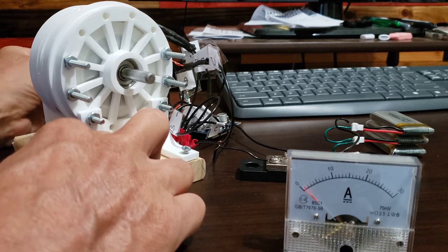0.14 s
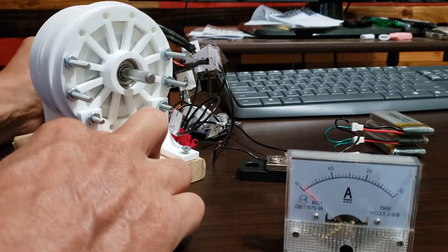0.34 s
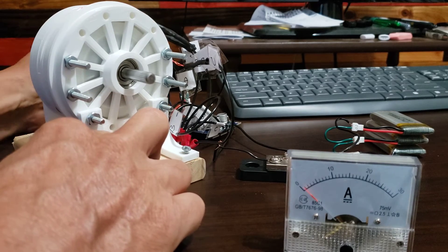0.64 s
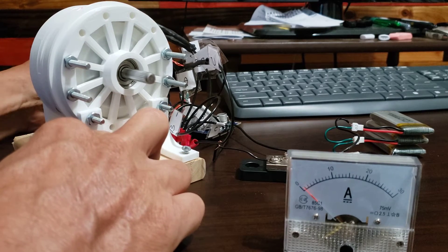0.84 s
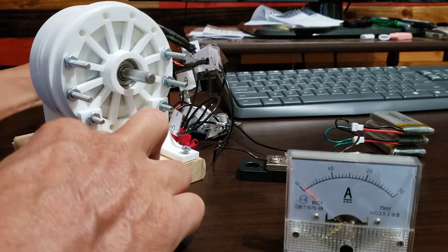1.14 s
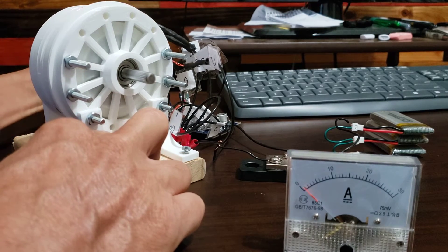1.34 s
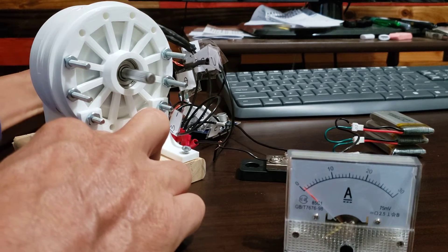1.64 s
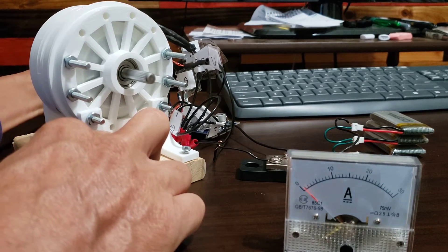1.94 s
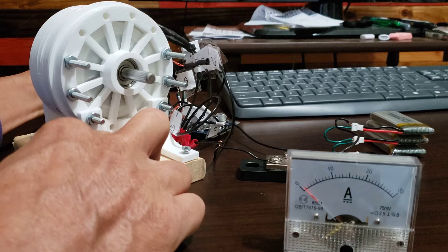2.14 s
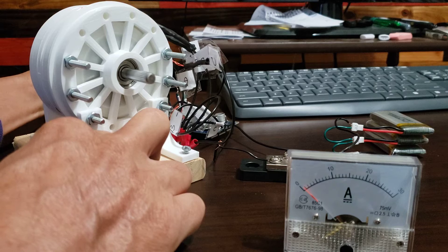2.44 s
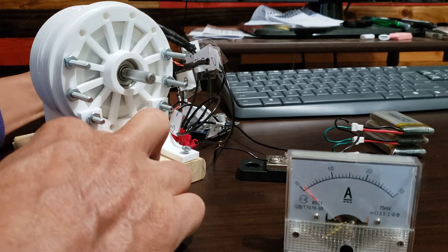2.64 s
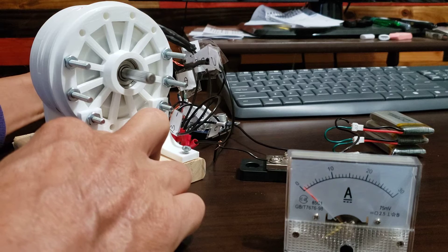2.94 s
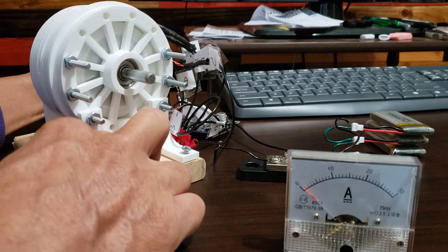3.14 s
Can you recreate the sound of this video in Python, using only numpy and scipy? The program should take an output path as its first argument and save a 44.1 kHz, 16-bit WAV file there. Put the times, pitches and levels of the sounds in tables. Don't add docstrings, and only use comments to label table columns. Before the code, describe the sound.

Small motor spinning at constant speed up close, whining evenly over buzzing hum, hiss and rattle.

```python
import sys
import numpy as np
from scipy import signal
from scipy.fft import rfft, irfft
from scipy.io import wavfile

SR = 44100
rng = np.random.default_rng(int(sys.argv[2]) if len(sys.argv) > 2 else 0)


def int16_out(signal):
    q = np.round(np.clip(np.atleast_2d(signal).T, -1, 1) * 32767)
    wavfile.write(sys.argv[1], SR, q.astype(np.int16))


def to_linear_factor(level_db):
    exponent = np.asarray(level_db, float) / 20
    return 10 ** exponent


N = 145530

SLOTS = 24

# time in seconds, slot whine in Hz.
SPEED = [
    (0, 2054.4),
    (.5, 2056),
    (1.6, 2055.7),
    (2.2, 2054.4),
    (3.3, 2054.2),
]
# time in seconds, level in dB.
POSE = [
    (0, -2.5),
    (.16, -2),
    (.32, -1),
    (.5, 0),
    (.85, -0.43),
    (1.3, 0),
    (2.2, 0.16),
    (3.3, -0.12),
]


def read(points, hz):
    f, value = np.transpose(points)
    return np.interp(np.log(hz + 1), np.log(f + 1), value)


def bins():
    return np.fft.rfftfreq(N, 1 / SR)


def evened(x):
    return x / np.sqrt(np.mean(x ** 2, axis=-1, keepdims=True) + 1e-20)


def unit(gain):
    return gain / np.linalg.norm(gain)


def stereo(left, right):
    return np.array([[left], [right]])


def over_time(table, column):
    rows = np.array(table)
    return np.interp(np.arange(N) / SR, rows[:, 0], rows[:, column])


def drift(rate_hz, depth, shape=lambda v: v):
    t = np.arange(0, N + 128, 128) / SR
    hz = np.geomspace(rate_hz / 12, rate_hz, 12)[:, None]
    waves = np.sin(2 * np.pi * (hz * t + rng.random(hz.shape))) / np.sqrt(hz)
    return np.interp(np.arange(N) / SR, t, shape(depth * evened(waves.sum(axis=0))))


def turns():
    start_turn = .30
    return np.cumsum(over_time(SPEED, column=1)) / SR / SLOTS + start_turn


def whine():
    # left in dB, right in dB, left lead in rad, reflection left and right [ratio].
    tones = [
        (-33.5, -33.5, 1.83, 1, 0.65),
        (-46.5, -38, -2.5, 0, 0.11),
    ]
    # time in seconds, left in cm, right in cm.
    hand = [
        (0, 10.6, 3),
        (.16, 10.8, 2.2),
        (.32, 9.7, 1.2),
        (.47, 8.5, 4.2),
        (.65, 6.4, 6.8),
        (.85, 5.5, 7.9),
        (1.3, 4.7, 7.2),
        (2.1, 4.2, 7),
        (3.3, 4.6, 7.1),
    ]
    waver_db, jitter_rad = 0.67, 0.044
    standing, standing_cm = .72, 7.5
    path_m = np.array([over_time(hand, column=1), over_time(hand, column=2)]) / 100
    angle = 2 * np.pi * SLOTS * turns()
    late_rad = 2 * np.pi * over_time(SPEED, column=1) * path_m / 343
    out = np.zeros((2, N))
    for k, (left_db, right_db, lead_rad, echo_left, echo_right) in enumerate(tones, 1):
        phase = k * (angle + drift(140, jitter_rad)) + stereo(lead_rad, 0)
        both = np.sin(phase) + stereo(echo_left, echo_right) * np.sin(phase - k * late_rad)
        if k == 2:
            spot = 1 - standing_cm / 100 / path_m[0]
            both[0] *= 1 + standing * np.cos(k * late_rad[0] * spot)
        out += np.sqrt(2) * to_linear_factor(stereo(left_db, right_db) + drift(330, waver_db)) * both
    return out


def hum():
    orders = [1, 2, 3, 4, 5, 6, 7, 8, 9, 10, 11, 12, 13, 16, 17, 18, 30, 32, 36, 52, 56, 60, 64, 68, 72, 88,
              112, 120]
    more_orders = [40, 44, 105, 108, 114, 116, 134]
    # left in dB, right in dB, left lead in rad.
    order_levels = [(-47.0, -56.0, 0.2), (-50.0, -49.0, 0.2), (-48.5, -49.5, -0.0), (-57.0, -58.0, -0.2),
                    (-48.0, -49.0, 0.0), (-46.0, -48.0, -0.3), (-50.0, -60.0, -0.3), (-44.3, -59.0, 1.5),
                    (-59.0, -46.5, 2.1), (-58.0, -63.0, 0.4), (-57.5, -60.0, 0.6), (-56.0, -55.0, -0.5),
                    (-59.0, -67.0, 0.9), (-64.0, -56.0, 2.4), (-64.0, -61.0, 1.0), (-62.0, -68.0, 1.2),
                    (-60.0, -61.0, -2.1), (-51.0, -57.0, -3.0), (-55.0, -66.0, -2.2), (-63.0, -68.0, 0.6),
                    (-63.0, -59.0, -1.8), (-62.0, -55.0, -1.8), (-67.0, -57.0, 0.3), (-62.0, -69.0, 0.3),
                    (-52.0, -67.0, -1.4), (-62.0, -76.0, -0.8), (-70.0, -65.0, 0.5), (-70.0, -64.0, 1.4)]
    more_levels = [(-60, -60, 3), (-59, -59, 3), (-75, -66, .1), (-72, -66, .1), (-72, -66, .1),
                   (-72, -67, .1), (-66, -66, .1)]
    waver_db, jitter_rad = 1.7, 0.0049
    frame_hz, frame_width_hz, grip = 464, 150, 3.6
    pose_db = over_time(POSE, column=1)
    angle = 2 * np.pi * turns()
    out = np.zeros((2, N))
    for k, (left_db, right_db, lead_rad) in zip([*orders, *more_orders], [*order_levels, *more_levels]):
        phase = 2 * np.pi * rng.random() + k * (angle + drift(20, jitter_rad))
        size = np.sqrt(2) * drift(6.01, waver_db, to_linear_factor)
        if k < 9:
            order_hz = k * SPEED[1][1] / SLOTS
            nearness = np.exp(-((order_hz - frame_hz) / frame_width_hz) ** 2)
            size = size * to_linear_factor(grip * pose_db * nearness)
        out[0] += to_linear_factor(left_db) * size * np.sin(phase + lead_rad)
        out[1] += to_linear_factor(right_db) * size * np.sin(phase)
    return out


def ring(train, modes):
    rise_s = .0014
    t = np.arange(1200) / SR
    rise = np.sin(np.pi / 2 * np.minimum(t / rise_s, 1)) ** 2
    taps = np.zeros((2, len(t)))
    for hz, t60_s, left_db, right_db in modes:
        decay = to_linear_factor(-60 * np.maximum(t - rise_s, 0) / t60_s)
        taps += to_linear_factor(stereo(left_db, right_db)) * rise * decay * np.sin(2 * np.pi * (hz * t + rng.random()))
    return signal.oaconvolve(train[None], taps, axes=1)[:, :N]


def once_a_turn(lead_turn, size):
    at = np.flatnonzero(np.diff(np.floor(turns() + lead_turn)))
    chance = rng.standard_normal((len(at), 2))
    uneven = (8 * chance[:, 0]).astype(int)
    train = np.zeros(N)
    train[np.clip(at + uneven, 0, N - 1)] = size(at / SR, chance[:, 1])
    return train


def ticks():
    # centre in seconds, strength in dB.
    bursts = [(.17, -7), (.27, -16), (.52, -4), (.7, -18), (.8, -6), (.88, -6), (.96, -8), (1.03, -8),
              (1.13, -9), (1.3, -10), (1.38, -4), (1.56, -2), (1.66, -11), (1.77, -8), (1.9, -5),
              (2.0, -18), (2.12, -14), (2.21, -18), (2.34, -4), (2.43, -4), (2.55, -10), (2.68, -3),
              (2.87, -3), (2.97, -24), (3.06, -5), (3.17, -7), (3.26, -2)]
    # time in seconds, peak in dB.
    hard = [(0.1471, -26), (0.2638, -27), (0.3336, -34), (0.4389, -27), (0.4853, -33), (0.5087, -30),
            (0.6958, -31), (0.7771, -32), (0.7886, -29), (0.8011, -24), (0.836, -27), (0.8714, -25),
            (0.9522, -36), (0.9522, -30), (0.9757, -33), (0.9991, -25), (1.1044, -29), (1.1273, -30),
            (1.1513, -29), (1.3613, -27), (1.3728, -28), (1.513, -27), (1.5369, -26), (1.5943, -29),
            (1.6182, -35), (1.6766, -31), (1.6881, -28), (1.7355, -35), (1.7699, -27), (1.8282, -26),
            (1.8976, -32), (1.9335, -28), (1.9799, -35), (1.9919, -31), (2.1196, -28), (2.2024, -32),
            (2.3186, -32), (2.3421, -30), (2.366, -26), (2.389, -25), (2.4708, -35), (2.4927, -35),
            (2.5052, -33), (2.5755, -33), (2.6579, -32), (2.6698, -28), (2.7033, -29), (2.7631, -32),
            (2.8444, -33), (2.8444, -26), (2.8674, -29), (2.8918, -33), (3.0081, -33), (3.032, -24),
            (3.055, -25), (3.1133, -29), (3.1602, -32), (3.1717, -27), (3.2066, -29), (3.2186, -28)]
    mode_hz = [11450, 11850, 12250, 13500, 10700]
    # t60 in seconds, left in dB, right in dB.
    mode_rings = [(.011, -35, -37), (.008, -46, -31), (.007, -48, -35), (.004, -47, -47), (.024, -45, -61)]
    burst_s, base_db, spread_db, hard_gain_db, colour_db = 0.027, -14.5, 8.5, 27, 2.5
    centre_s, strength_db = np.transpose(bursts)
    hard_s, hard_db = np.transpose(hard)

    def size(s, z):
        burst = np.exp(-((s[:, None] - centre_s) / burst_s) ** 2)
        swell = to_linear_factor(base_db) + (to_linear_factor(strength_db) * burst).sum(axis=1)
        out = np.tanh(swell) * to_linear_factor(4.0 + spread_db * np.clip(z, -3, 0.3))
        nearest = abs(s[:, None] - hard_s).argmin(axis=0)
        out[nearest] = to_linear_factor(hard_db + hard_gain_db)
        return out

    train = once_a_turn(.1, size)
    out = np.zeros((2, N))
    for mode in np.c_[mode_hz, mode_rings]:
        out += ring(train * to_linear_factor(colour_db * rng.standard_normal(N)), [mode])
    return out


def rattles():
    # time in seconds, peak in dB, dull ring relative in dB.
    knocks = [(0.4853, -41, 3), (0.7068, -41, -8), (0.7185, -37.5, 3.5), (0.1231, -42, 2),
              (0.2399, -48, -2), (0.9378, -42, 1), (1.1378, -42, -2), (1.1613, -40, -2), (1.173, -40, -5),
              (1.2431, -43, -6), (1.2945, -46, -4), (1.3825, -43, -6), (1.8322, -44, -4), (2.1999, -47, 5),
              (2.2233, -42, 8), (2.3072, -47, 7), (2.4094, -39, 1), (2.599, -41, -10), (2.8429, -38.5, -1),
              (1.4302, -44, -9), (1.4422, -44, -7), (1.454, -33, -12), (1.5005, -46, -6), (1.5125, -38, -9),
              (1.524, -37, -5), (1.7101, -42, -1), (1.944, -44, -10), (1.968, -43, -9), (2.154, -43, -8),
              (2.4928, -38, -3), (2.5277, -41, -9), (2.5511, -38, 0), (2.5756, -39, -7), (2.6215, -39, -10),
              (2.691, -39, 0), (2.7028, -36, -11), (2.7148, -34.5, -14), (2.7968, -37, -5),
              (2.8899, -39, 3.5), (2.914, -33, -15), (2.959, -38, -13), (2.9842, -34.5, -13),
              (3.0078, -38, -10), (3.0522, -36, -15), (3.1827, -38, -5)]
    # mode in Hz, t60 in seconds, left in dB, right in dB.
    bright_modes = [(7130, 0.0026, 11.9, -7), (6170, 0.0062, 4.6, -8)]
    dull_modes = [(5210, 0.0091, 2.7, 13)]
    faint_db, spread_db = -60.5, 3.5
    bright = once_a_turn(.12, lambda s, z: to_linear_factor(faint_db + spread_db * z))
    dull = once_a_turn(.15, lambda s, z: to_linear_factor(faint_db + 1.0 + spread_db * z))
    for s, peak_db, dull_db in knocks:
        bright[round(s * SR)] += to_linear_factor(peak_db - 1.5)
        dull[round(s * SR)] += to_linear_factor(peak_db + dull_db - 5.5)
    return ring(bright, bright_modes) + ring(dull, dull_modes)


def noise_pair(gains):
    # frequency in Hz, left-right likeness [-1..1].
    likeness = [(40, 0.99), (300, 0.95), (700, 0.47), (1400, -0.14), (2900, 0.0014), (3450, -0.47),
                (4100, -0.42), (15000, 0.16)]
    a, b = rfft(rng.standard_normal((2, N)))
    same = np.clip(read(likeness, bins()), -1, 1)
    pair = np.array([a, same * a + np.sqrt(1 - same ** 2) * b])
    return irfft(pair * gains * np.sqrt(len(a)), N)


def resonances(table):
    power = 0
    for hz, width_hz, left_db, right_db in table:
        peak = unit(1 / (1 + (2 * (bins() - hz) / width_hz) ** 2))
        power = power + (to_linear_factor(stereo(left_db, right_db)) * peak) ** 2
    return np.sqrt(power)


def air_hiss():
    # frequency in Hz, density in dB per Hz.
    hiss_left = [(1200, 0.5), (2900, 0.5), (3300, -0.5), (3800, 3), (4700, -3.5), (7400, -2), (8800, -8),
                 (13000, -6)]
    hiss_right = [(1200, -1.5), (2000, -0.5), (3300, -6.5), (5200, 0), (7500, -10.5), (8200, -6),
                  (11000, -9), (15600, -15)]
    hiss_db = [-37, -39.5]
    ring_hz = [10700, 11450, 11900, 15650]
    # width in Hz, left in dB, right in dB.
    frame_rings = [(70, -49, -51.5), (620, -54.5, -50.5), (2420, -53.5, -44), (60, -69, -67)]
    f = bins()
    low_cut = np.minimum(f / 1000, 1) ** 3
    hiss = [to_linear_factor(db) * unit(to_linear_factor(read(table, f)) * low_cut)
            for table, db in zip([hiss_left, hiss_right], hiss_db)]
    breath = to_linear_factor(1.07 * np.cos(2 * np.pi * turns()) + drift(10, 0.97))
    return breath * noise_pair(np.hypot(hiss, resonances(np.c_[ring_hz, frame_rings])))


def desk_rumble():
    # frequency in Hz, density in dB per Hz.
    rumble = [(25, -41), (45, -1), (100, -7.5), (200, -5), (260, -5), (360, -7.5), (520, -7), (1500, -15.5)]
    # resonance in Hz, width in Hz, left in dB, right in dB.
    desk_modes = [(57, 20, -48, -51.5), (121.2, 14, -49, -49.5), (239, 5.9, -51, -53),
                  (257.4, 16, -51.5, -53.5), (770.7, 18, -63, -51.5), (415.2, 17, -57.5, -53.5),
                  (288, 11, -57, -59), (795, 48, -54, -56.5), (3970, 61, -76, -61)]
    rumble_db, early_dark, dark_hz = -45, 1.9, 800
    f = bins()
    low = to_linear_factor(rumble_db) * unit(to_linear_factor(read(rumble, f)) * np.minimum(f / 25, 1) ** 2 / (1 + (f / 2500) ** 4))
    desk = noise_pair(np.hypot(low, resonances(desk_modes)))
    body = irfft(rfft(desk) * np.exp(-np.log(f / dark_hz + 1e-9) ** 2), N)
    return desk + body * (to_linear_factor(early_dark * over_time(POSE, column=1)) - 1)


def scene():
    return whine() + hum() + ticks() + rattles() + air_hiss() + desk_rumble()


def top_cut(x):
    return signal.sosfilt(signal.butter(12, 15830, fs=SR, output="sos"), x)


def record(dry):
    # dip in Hz, width in Hz, left in dB, right in dB.
    dips = [(1600, 320, -3, -3.5), (3330, 100, -6.5, 6.5), (4410, 390, -0.5, -4), (7500, 350, -0.4, -2),
            (8950, 600, -10, -3.5), (10900, 280, -1, -2), (15500, 520, -2, -1)]
    edge_hz = 15740
    colour_db = sum(stereo(left_db, right_db) * np.exp(-(2 * (bins() - hz) / width_hz) ** 2)
                    for hz, width_hz, left_db, right_db in dips)
    coloured = irfft(rfft(dry) * to_linear_factor(colour_db), N)
    low_pass = signal.firwin(511, edge_hz, window=("kaiser", 9), fs=SR)
    band = signal.oaconvolve(coloured, low_pass[None], "same")
    return top_cut(band * to_linear_factor(over_time(POSE, column=1)))


dry = scene()
out = record(dry)
int16_out(out)
```